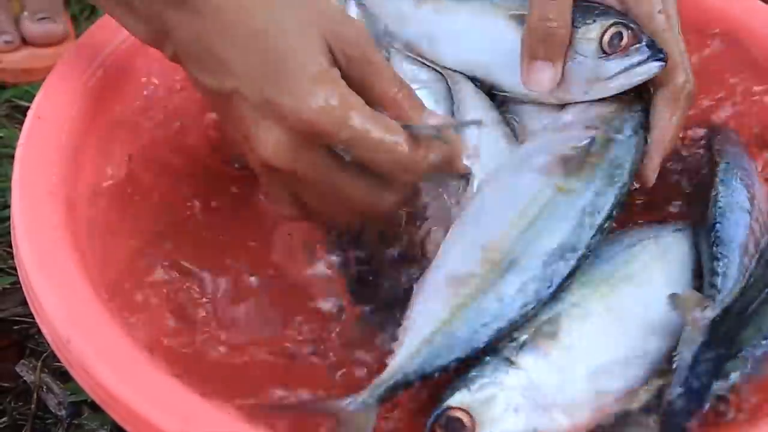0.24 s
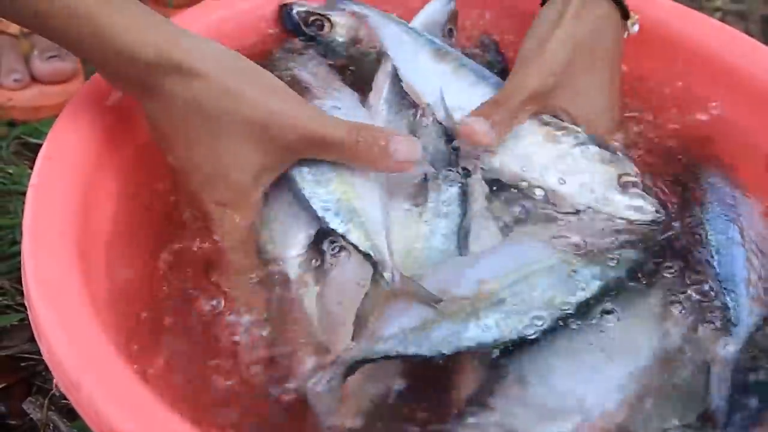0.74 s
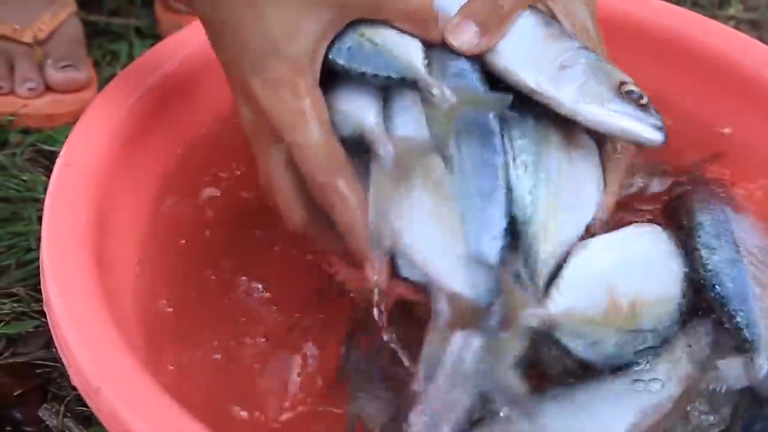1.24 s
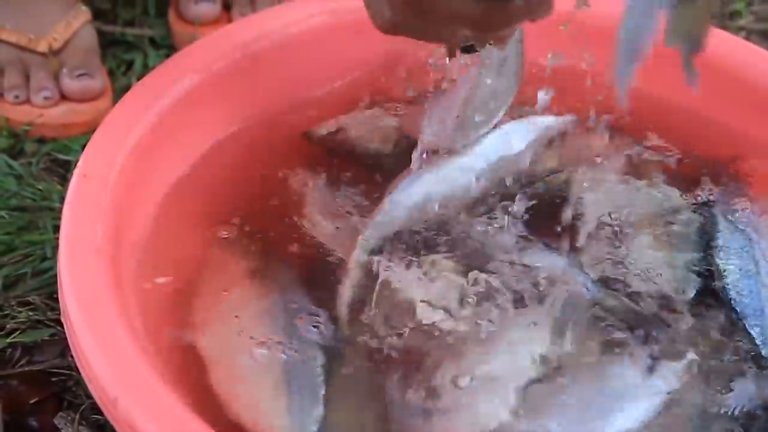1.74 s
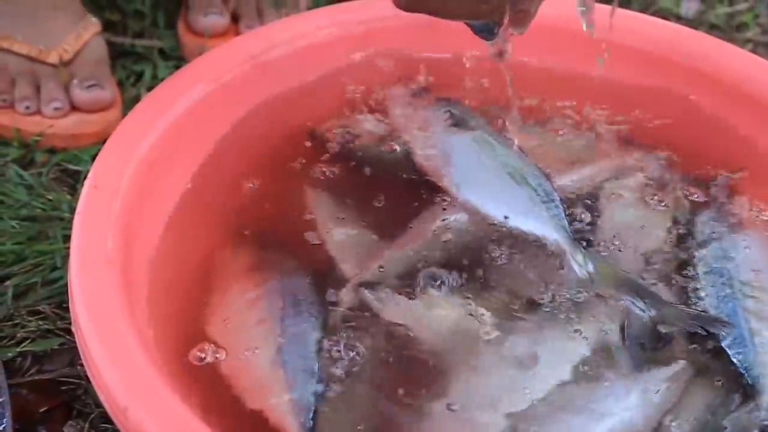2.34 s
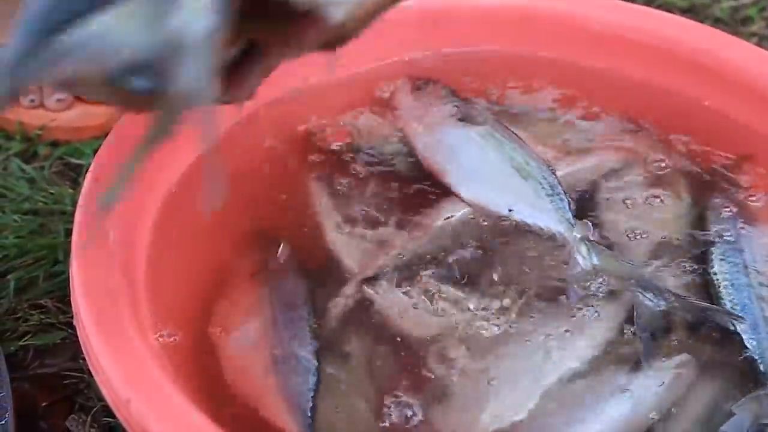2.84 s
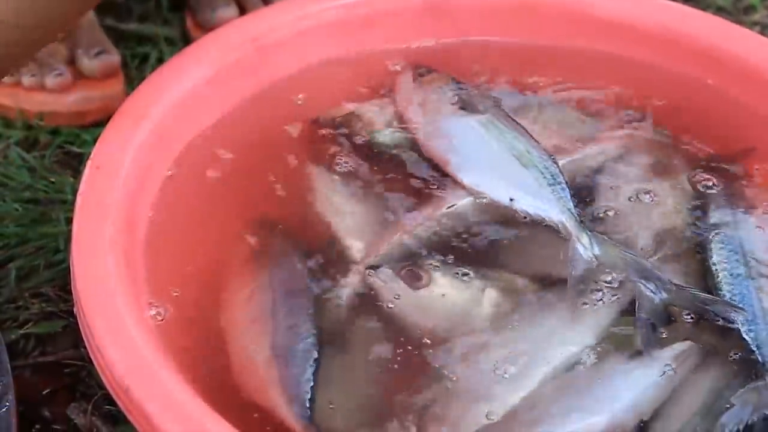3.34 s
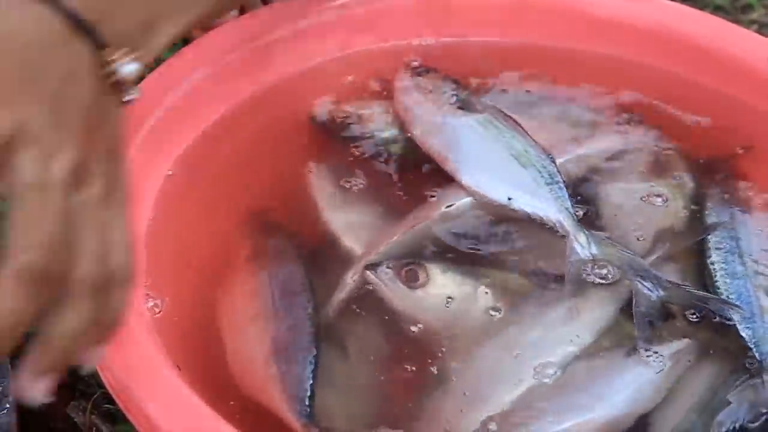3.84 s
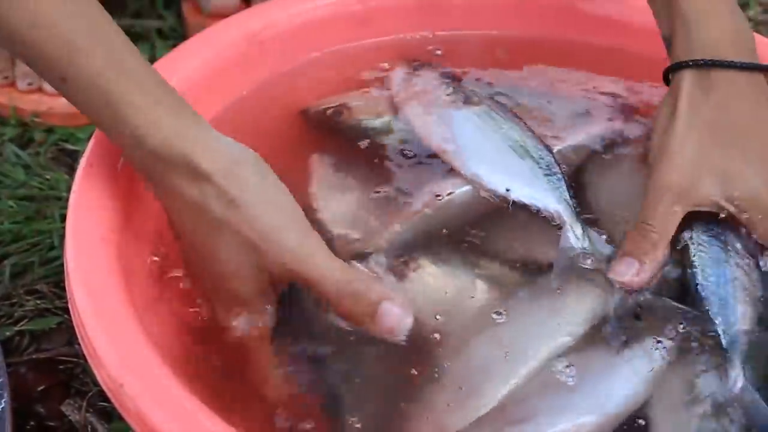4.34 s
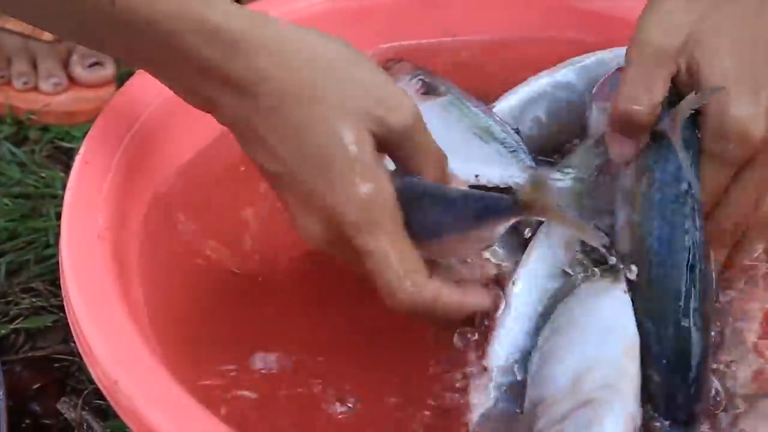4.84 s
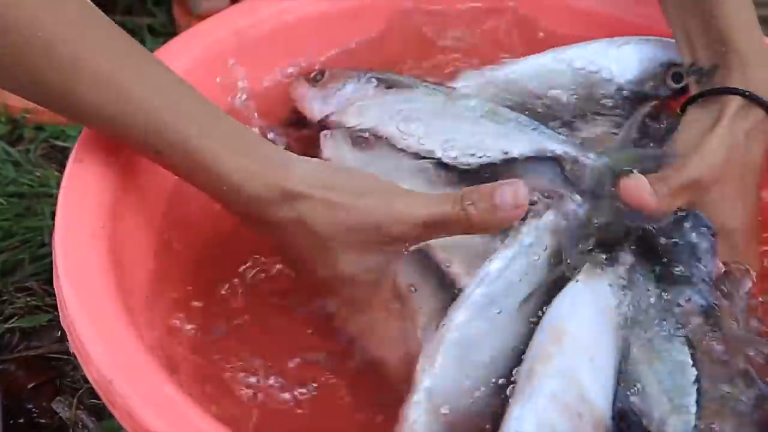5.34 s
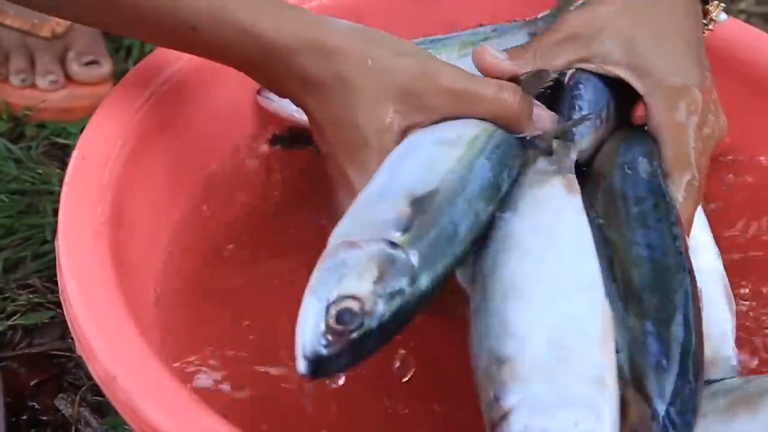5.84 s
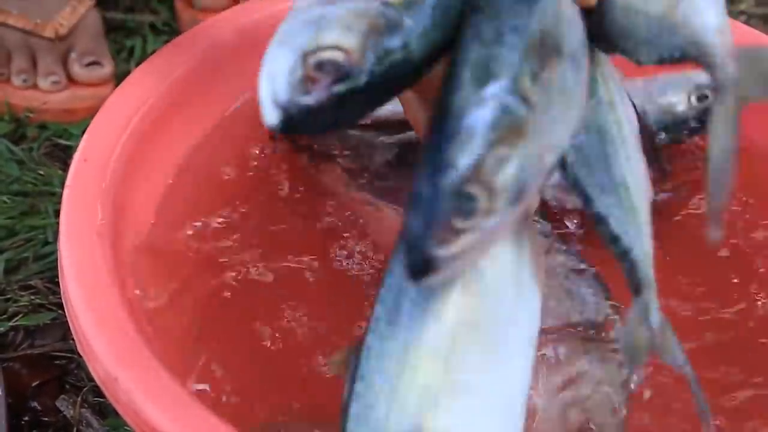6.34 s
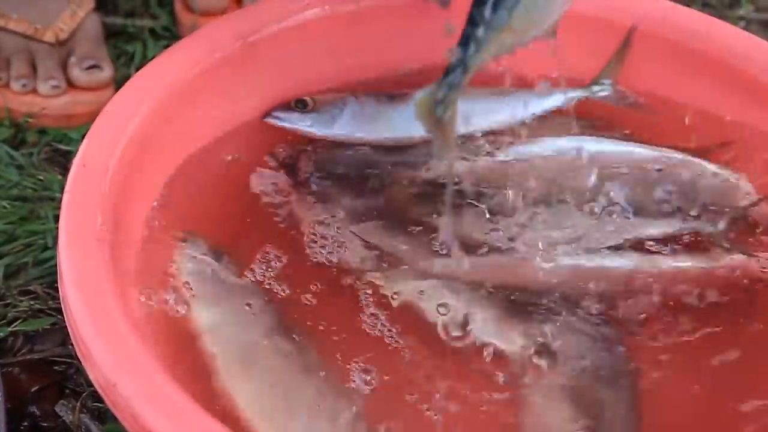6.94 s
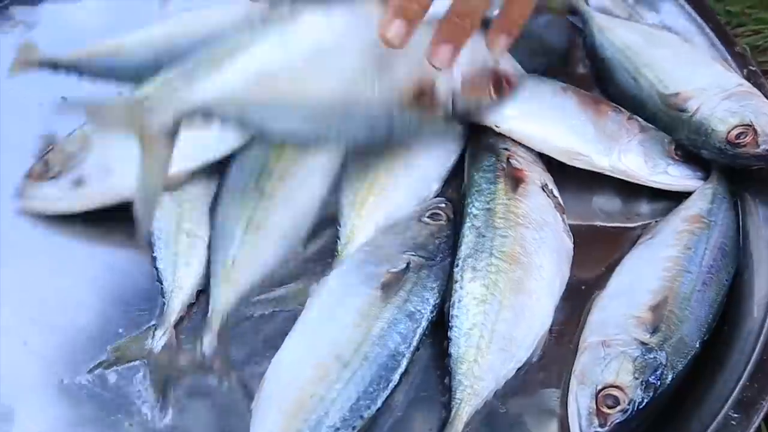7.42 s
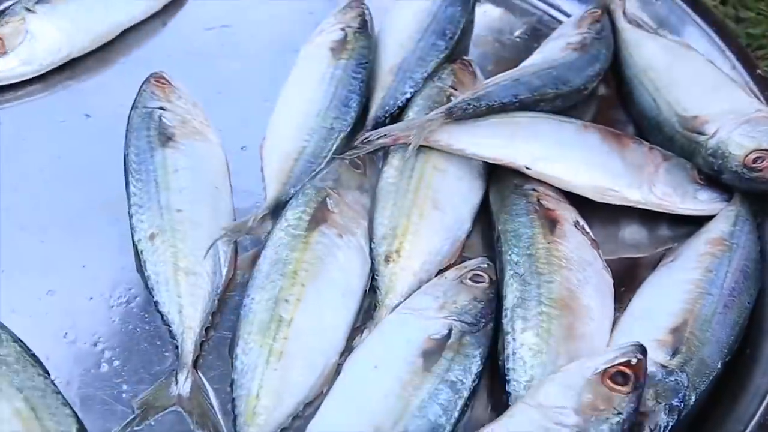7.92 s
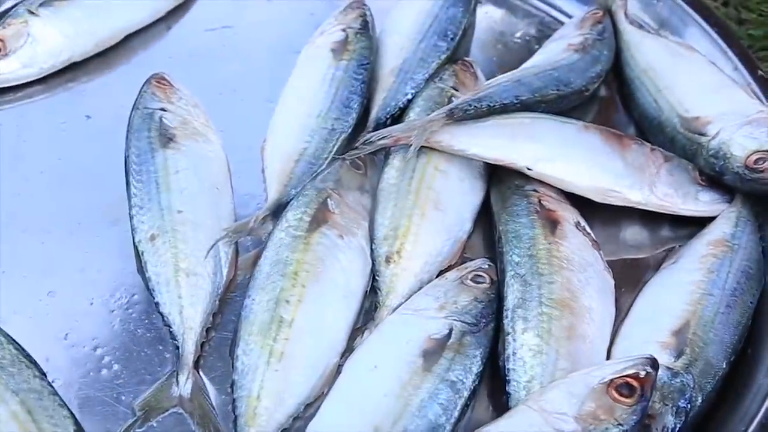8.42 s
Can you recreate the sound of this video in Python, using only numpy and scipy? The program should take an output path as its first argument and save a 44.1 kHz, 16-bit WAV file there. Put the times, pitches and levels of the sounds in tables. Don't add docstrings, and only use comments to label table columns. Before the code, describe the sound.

Hands slosh and gurgle water in a plastic basin washing fish, with drips, wet slaps, faint steel tray rings, low wind rumble and far birds.

```python
import sys
import numpy as np
from scipy import signal
from scipy.io import wavfile
from scipy.ndimage import uniform_filter1d

SR = 44100
rng = np.random.default_rng(int(sys.argv[2]) if len(sys.argv) > 2 else 0)


def master_out(mix):
    frames = np.transpose(np.atleast_2d(mix))
    ceiling = np.clip(frames, -1, 1)
    pcm = np.round(ceiling * 32767).astype(np.int16)
    wavfile.write(sys.argv[1], SR, pcm)


def magnitude_from_level(level_db):
    exponent = np.asarray(level_db, float) / 20
    return 10 ** exponent


N = 382788
TOP_HZ = 15900

# start_s [s], peak_db [dB], pitch_hz [Hz]
EARLY_DROPLETS = [(0.079, -20, 4110), (0.187, -13, 3660), (0.2079, -15, 7250), (0.2355, -15, 5200),
                  (0.299, -12, 7500), (0.3645, -16, 3840), (0.39, -18, 8660), (0.425, -25, 5500),
                  (0.5165, -16, 4510), (0.575, -13, 3600), (0.604, -15, 4770), (0.617, -8.5, 8300),
                  (0.6264, -14, 3660), (0.636, -12, 4370), (0.6624, -38, 3670), (0.7593, -20.5, 5640),
                  (0.813, -21, 8350), (0.898, -23, 4670), (1.0137, -30, 5830), (1.0266, -25.5, 3680),
                  (1.0807, -26, 4100), (1.102, -21, 4400), (1.185, -21, 5870), (1.3265, -27, 7060),
                  (1.376, -16, 8000), (1.4073, -18, 5070), (1.494, -17, 6700), (1.59, -12.5, 5630),
                  (1.9732, -17.5, 4010), (2.1935, -27, 8570), (2.2073, -19, 8200), (2.2323, -31, 3470),
                  (2.3191, -21.5, 7140), (2.361, -22, 8900), (2.379, -15.5, 12800), (2.4404, -24, 4830),
                  (2.5436, -19.5, 3640), (2.6, -19, 13000), (2.7787, -28, 5270), (2.804, -25, 4330)]
# start_s [s], peak_db [dB], pitch_hz [Hz]
LATER_DROPLETS = [(3.6254, -20, 9100), (3.8018, -20, 3600), (4.349, -19, 6900), (4.495, -28, 4280),
                  (4.5967, -23, 4330), (4.7636, -21, 4910), (4.78, -16, 3530), (4.835, -13, 7180),
                  (4.9801, -34, 7550), (5.0146, -12.5, 8980), (5.3694, -16.5, 7560), (5.489, -26, 7240),
                  (5.5212, -25, 3760), (5.599, -15, 12900), (5.637, -17, 4620), (5.902, -32, 4970),
                  (6.037, -21.5, 7520), (6.0482, -15.5, 4660), (6.1356, -26, 3900), (6.3856, -14, 3910),
                  (6.57, -23.5, 5980), (6.6822, -21, 4900), (6.757, -24, 7120), (6.797, -19, 4000),
                  (6.8905, -24.5, 4120), (6.96, -19, 8360), (6.986, -26, 7100), (7.1, -26, 12700),
                  (7.116, -14.5, 6840), (7.4804, -28, 4140), (8.207, -23, 7370), (8.2628, -28, 4540),
                  (8.091, -25, 2950), (8.534, -24, 4570), (8.612, -26.5, 3810)]


def rms_one(x):
    return x / np.sqrt(np.mean(x ** 2) + 1e-20)


def band(x, low_hz, high_hz, order=2):
    edges_hz = [low_hz, min(high_hz, .45 * SR)]
    return signal.sosfilt(signal.butter(order, edges_hz, "band", fs=SR, output="sos"), x)


def drift(rate):
    r = np.exp(-80 * np.pi * rate / SR)
    slow = signal.lfilter([1], [1, -2 * r, r * r], rng.standard_normal(N // 40 + 2002))
    slow = slow[2000:]
    return np.interp(np.arange(N) / 40, np.arange(len(slow)), rms_one(slow))


def add(out, start_s, sound):
    at = max(round(start_s * SR), 0)
    out[at:at + len(sound)] += sound[:N - at]


def swells(rows, rest_db):
    t = np.arange(0, N, 64) / SR
    each = []
    for peak_s, peak_db, build_s, die_s in rows:
        before = (peak_s - t) / max(build_s, .02)
        after = (t - peak_s) / max(die_s, .02)
        each.append(peak_db - 20 * np.maximum(before, after))
    return np.interp(np.arange(N) / SR, t, np.maximum(np.max(each, axis=0), rest_db))


def wind():
    # peak_s [s], rumble_db [dB], build_up_s [s], dying_away_s [s]
    gusts = [(0.01, -34, 0.33, 0.19), (.58, -30, 0.19, 0.75), (1.2, -33.5, 0.31, 0.8),
             (1.72, -21, 0.11, 0.09), (2.1, -24, 1, 0.21), (2.41, -22.5, 0.18, 0.74),
             (2.98, -23.5, 0.2, 0.31), (3.34, -12.5, 0.29, 0.098), (3.54, -22.5, .7, 0.51),
             (3.85, -19.5, 0.41, 0.069), (4.31, -24.5, 1.3, 0.87), (4.75, -21.5, 0.25, 0.16),
             (5.16, -22.5, 0.53, 0.78), (5.87, -25, 1.6, 0.64), (6.97, -21, 0.69, 0.63),
             (7.43, -16.5, 0.18, 0.27), (7.69, -19, 0.058, 1), (8.15, -18.5, 0.72, 0.31),
             (8.67, -21.5, 3.2, .5)]
    # peak_s [s], flutter_db [dB], build_up_s [s], dying_away_s [s]
    buffets = [(.45, -43, 3.5, 0.28), (2.1, -43, 6.8, 0.21), (2.41, -39.5, 0.1, 0.79),
               (3.22, -18.5, 0.056, 0.15), (3.54, -28, 0.1, 0.19), (4.31, -39.5, 0.4, 4.4),
               (4.75, -35.5, 0.92, 0.25), (5.16, -36, 0.11, 0.2), (6.2, -44.5, 1, 3.8),
               (6.97, -35, 0.53, 0.73), (7.43, -23.5, 0.2, 0.3), (7.78, -19, 0.27, 0.26),
               (8.15, -17, 0.19, 0.096), (8.49, -28.5, 0.78, 0.32)]
    rumble_db = swells(gusts, rest_db=-53)
    flutter_db = swells(buffets, rest_db=-58.5)
    white = rng.standard_normal((2, N))
    rumble = rms_one(band(white[0], 14, 44) * magnitude_from_level(3 * drift(8)))
    flutter = band(white[1], 61.3, 147.5, order=3) + 0.014 * band(white[1], 130, 540)
    flutter = rms_one(flutter * magnitude_from_level(6.1 * drift(30.5)))
    return magnitude_from_level(rumble_db) * rumble + magnitude_from_level(flutter_db) * flutter


def air():
    # pitch_hz [Hz], level_db [dB per Hz]
    air_colour = [(88, -40), (150, -2.5), (422, -3), (566, -9.5), (730, -11), (871, -4), (1040, -16),
                  (16000, -25)]
    colour_hz, colour_db = np.transpose(air_colour)
    edges_hz = 150 * 2 ** np.arange(0, 7.1, .5)
    white = rng.standard_normal((2, N))
    hiss = np.zeros(N)
    for k, (low, high) in enumerate(zip(edges_hz, edges_hz[1:])):
        middle = np.log(low * high) / 2
        own_db = np.interp(middle, np.log(colour_hz), colour_db)
        hiss += magnitude_from_level(own_db + drift(5.5)) * band(white[k % 2], low, high)
    top_filter = signal.cheby2(10, 40, TOP_HZ, fs=SR, output="sos")
    return magnitude_from_level(-50.5) * signal.sosfilt(top_filter, rms_one(hiss))


def ringing(rows):
    out = np.zeros(N)
    for start_s, level_db, hz, t60_s, rise in rows:
        t60_s, rise = max(t60_s, .001), np.clip(rise, 0, 8)
        t = np.arange(int(t60_s * SR)) / SR
        swell_in = np.minimum(t * min(hz, 5000), 1)
        shape = magnitude_from_level(level_db - 60 * t / t60_s) * swell_in
        bent_t = t + rise * t ** 3 / t60_s ** 2 / 3
        add(out, start_s, shape * np.sin(2 * np.pi * hz * bent_t))
    return out


def crowd(low_hz, high_hz, cycles, spread_db, count):
    u = rng.random((count, 6))
    density = np.cumsum(magnitude_from_level(4 * drift(20)))
    at = np.minimum(np.searchsorted(density, u[:, 0] * density[-1]), N - 1)
    hz = low_hz * (high_hz / low_hz) ** ((u[:, 1] + u[:, 5]) / 2)
    size_db = -spread_db * np.log(u[:, 2] + .02) - .5 * np.log2(hz / low_hz)
    ring_cycles = cycles * (0.5 + u[:, 3] ** 2)
    rise = 4.5 * u[:, 4] ** 1.5 * (hz < 6000)
    return rms_one(ringing(np.c_[at / SR, size_db, hz, ring_cycles / hz, rise]))


def hands_away():
    # from_s [s], to_s [s]
    quiet_times = [
        (.78, 1.15),
        (2.25, 4.22),
        (6.5, 8.17),
    ]
    t = np.arange(N) / SR
    away = sum((t > from_s) * (t < to_s) for from_s, to_s in quiet_times)
    return uniform_filter1d(away * 1., size=2000)


def small_bubbles(level_db):
    away = hands_away()
    rush = rms_one(band(rng.standard_normal(N), 450, 3800)) * magnitude_from_level(4 * drift(110))
    gurgle = crowd(750, 7500, cycles=46, spread_db=3.6, count=3500)
    return magnitude_from_level(level_db - 5) * ((1 - .7 * away) * gurgle + (.3 + .45 * away) * rush)


def spray(level_db):
    away = hands_away()
    hiss = rms_one(band(rng.standard_normal(N), 3000, 11000)) * magnitude_from_level(2 * drift(25))
    ticking = crowd(4000, 19500, cycles=15, spread_db=5.2, count=1900)
    return magnitude_from_level(level_db - 6) * ((1 - .6 * away) * ticking + (.11 + .3 * away) * hiss)


def large_bubbles():
    # start_s [s], peak_db [dB], pitch_hz [Hz], t60_s [s]
    hanging = [(6.4419, -16.5, 1096, 0.11), (0.022, -27.5, 1480, 0.032), (0.364, -34, 1240, 0.028),
               (0.405, -21, 1320, 0.032), (0.43, -17, 1210, 0.038), (0.515, -22, 1120, 0.024),
               (0.545, -26, 1390, 0.024), (0.627, -25, 3060, 0.039), (0.729, -22.5, 1390, 0.028),
               (0.981, -25, 774, 0.021), (1.088, -25, 1960, 0.023), (1.327, -28, 773, 0.024),
               (1.349, -18, 764, 0.023), (1.434, -22, 3260, 0.03), (1.5, -24, 980, 0.015),
               (1.644, -20.5, 1000, 0.027), (1.761, -23, 1140, 0.039), (1.823, -26.5, 1103, 0.093),
               (4.294, -21, 620, 0.02), (4.394, -18, 1510, 0.017), (4.672, -24, 1870, 0.035),
               (4.698, -18.5, 2550, 0.022), (4.862, -20, 2240, 0.036), (4.918, -18, 1650, 0.032),
               (4.98, -24, 1370, 0.032), (5.035, -18, 830, 0.045), (5.066, -12, 960, 0.02),
               (5.132, -19.5, 2030, 0.047), (5.225, -28, 1470, 0.035), (5.36, -27.5, 1700, 0.047),
               (5.518, -29, 2200, 0.033), (5.9, -26.5, 1330, 0.035), (6.2, -22, 710, 0.037),
               (6.329, -25, 785, 0.06), (6.666, -32.5, 1250, 0.11), (6.699, -32, 1580, 0.041),
               (6.871, -27, 2320, 0.025), (7.29, -27, 810, 0.016), (8.187, -24, 1265, 0.061),
               (8.515, -31, 790, 0.067)]
    # start_s [s], peak_db [dB], pitch_hz [Hz], t60_s [s]
    drips = [(.056, -27.5, 935, 0.082), (1.788, -9, 1560, 0.02), (0.0703, -15.5, 1220, 0.042),
             (0.0799, -18.5, 990, 0.071), (0.6806, -4.5, 2820, 0.019), (1.057, -26, 1130, 0.036),
             (1.366, -27.5, 640, 0.1), (6.378, -10, 510, 0.012), (.57, -22, 671, 0.16),
             (1.41, -25, 755, 0.082), (1.7398, -24, 3900, 0.036), (1.9135, -21.5, 1550, 0.055),
             (2.1378, -19, 950, 0.073), (2.449, -24.5, 1660, 0.023), (2.464, -30, 1390, 0.042),
             (2.521, -26, 1260, 0.044), (2.5447, -24, 1294, 0.058), (2.5884, -22, 1162, 0.055),
             (2.638, -27.5, 3430, 0.018), (4.7914, -17.5, 865, 0.089), (5.0459, -13, 4404, 0.012),
             (5.6805, -11, 1565, 0.046), (5.7035, -17.5, 1380, 0.092), (5.79, -16.5, 1450, 0.06),
             (6.4267, -6.5, 1180, 0.063), (6.822, -20, 4030, 0.015), (7.0179, -23, 2440, 0.036),
             (2.2413, -21, 3420, 0.026), (2.2413, -27, 3010, 0.038), (5.6545, -7, 2220, 0.019),
             (5.8419, -16, 1084, 0.054), (6.0627, -20, 2920, 0.031), (4.753, -20, 880, 0.044),
             (6.413, -16, 2150, 0.017), (.252, -24, 923, 0.11), (.049, -18.5, 2450, 0.019),
             (5.625, -10.5, 1510, 0.012), (8.643, -32.5, 1080, 0.055), (7.0821, -25, 1380, 0.056)]
    # start_s [s], peak_db [dB], pitch_hz [Hz]
    plops = [(0.152, -12, 1850), (0.58, -12, 1900), (0.5907, -13, 1150), (1.1697, -11.5, 1760),
             (1.2426, -12.5, 800), (1.267, -13, 1010), (1.2908, -13, 1340), (1.5196, -9.5, 960),
             (1.571, -16, 1350), (2.0314, -7.5, 1430), (4.1828, -11, 850), (4.441, -12, 2310),
             (4.654, -13.5, 2140), (5.645, -10, 1170), (5.768, -10, 887), (5.8427, -11.5, 1865),
             (6.7312, -5.5, 1970)]
    # start_s [s], peak_db [dB], pitch_hz [Hz], t60_s [s]
    glugs = [
        (0.2041, -12.5, 1180, 0.09),
        (0.229, -15.5, 2020, 0.045),
        (2.0588, -22.5, 860, 0.16),
        (2.1686, -18.5, 955, 0.12),
        (4.7371, -20, 1740, 0.043),
        (5.0383, -11, 3200, 0.025),
        (5.5717, -1.5, 3060, 0.0084),
        (.168, -27.5, 756, 0.16),
        (.203, -25, 547, 0.1),
    ]
    # start_s [s], peak_db [dB], pitch_hz [Hz]
    ticks = [(0.4358, -11, 5360), (1.447, -14.5, 3300), (1.555, -11.5, 2680), (1.6104, -13.5, 2660),
             (1.6618, -13.5, 2600), (1.709, -14, 5040), (1.841, -13, 2670), (2.5215, -16, 3000),
             (4.184, -18, 4300), (4.419, -14, 3340), (4.6527, -10, 6040), (4.7442, -11, 2650),
             (4.8685, -9.5, 4700), (5.096, -7.5, 2150), (5.153, -9, 2860), (5.5554, -24, 11000),
             (5.749, -13.5, 2230), (6.1966, -11, 4760), (6.2, -15, 3120), (6.2048, -10, 5250),
             (6.299, -17, 2800), (6.7186, -10.5, 4230), (6.731, -11, 5230)]
    # start_s [s], peak_db [dB], pitch_hz [Hz], t60_s [s]
    thuds = [(6.773, -17, 340, 0.038), (3.5464, 2.5, 1815, 0.002), (3.5499, 12, 850, 0.0026),
             (3.6752, -10.5, 3800, 0.0023), (3.8197, -7.5, 2900, 0.004), (7.4484, -15, 542, 0.095),
             (7.4553, -13, 740, 0.04), (7.48, -11, 570, 0.038), (7.5481, 13, 577, 0.011),
             (7.5497, -6, 1260, 0.013), (7.5564, 6, 1090, 0.0037), (7.717, -8, 1630, 0.0075),
             (7.7177, -1.5, 655, 0.0089), (7.7692, 9, 762, 0.0032), (8.2135, -26, 1250, 0.079),
             (8.3162, -4, 2430, 0.0015)]
    rows = [(s, db, hz, 29.7 / hz, 2.17) for s, db, hz in ticks]
    rows += [(s, db, hz, 22 / hz, 2.04) for s, db, hz in plops]
    rows += [(s, db - 4, hz, 48 / hz, 0) for s, db, hz in EARLY_DROPLETS + LATER_DROPLETS]
    for table, rise in (hanging, 0.14), (glugs, 5.2), (drips, 0.56), (thuds, 2.03):
        rows += [(*row, rise) for row in table]
    return ringing(rows)


def splats():
    # start_s [s], peak_db [dB], t60_s [s]
    full_slaps = [(0.0677, -28, 0.0074), (0.4317, -27.5, 0.034), (0.5394, -34, 0.024), (1.659, -32, 0.019),
                  (1.7376, -31, 0.02), (1.777, -34, 0.037), (2.1487, -38.5, 0.026), (3.5498, -31.5, 0.18),
                  (4.1821, -30, 0.02), (4.868, -34.5, 0.088), (4.917, -34.5, 0.026), (5.031, -23.5, 0.038),
                  (5.156, -26.5, 0.04), (5.446, -34, 0.033), (5.5728, -26.5, 0.02), (6.1969, -23, 0.034),
                  (6.329, -27.5, 0.024), (7.449, -22.5, 0.034), (7.48, -22.5, 0.017), (7.5581, -16, 0.016),
                  (7.6264, -30, 0.028), (7.7152, -27.5, 0.033), (7.7659, -26.5, 0.04)]
    # start_s [s], peak_db [dB], t60_s [s]
    thin_cracks = [(0.4978, -27, 0.012), (1.45, -15.5, 0.013), (1.521, -26, 0.027), (1.899, -27, 0.014),
                   (2.412, -36.5, 0.02), (3.642, -30.5, 0.11), (4.543, -26.5, 0.0086),
                   (4.816, -21.5, 0.023), (5.1313, -21, 0.017), (5.293, -23.5, 0.034), (6.02, -30, 0.012),
                   (6.7193, -27.5, 0.02), (6.772, -17, 0.019), (6.8207, -32, 0.0075),
                   (6.8527, -22.5, 0.016), (8.318, -17.5, 0.0063), (8.3603, -21, 0.01),
                   (8.6475, -24, 0.011)]
    full_body_db, thin_body_db = -6.5, -18.5
    white = rng.standard_normal((2, N + SR))
    crack = rms_one(band(white[0], 5320, 9700) + 0.57 * band(white[0], 12600, 14400))
    body = rms_one(band(white[1], 430, 3530))
    crack *= magnitude_from_level(4.0 * rms_one(uniform_filter1d(white[1], size=90)))

    bursts = [(*row, full_body_db) for row in full_slaps]
    bursts += [(*row, thin_body_db) for row in thin_cracks]
    bursts += [(s, db - 15, .01, thin_body_db) for s, db, hz in EARLY_DROPLETS + LATER_DROPLETS]
    out = np.zeros(N)
    for start_s, peak_db, t60_s, body_db in bursts:
        t60_s = np.clip(t60_s, .004, .09)
        t = np.arange(int(t60_s * SR)) / SR
        at = round(start_s * SR)
        puff = crack[at:at + len(t)] + magnitude_from_level(body_db + 9.5) * body[at:at + len(t)]
        fade = magnitude_from_level(peak_db + 4.5 - 60 * t / t60_s)
        add(out, start_s, fade * np.minimum(t / 0.0017, 1) * puff)
    return out


def risers():
    racing = [(0.334, -34.5, 740, 1410, .04), (.64, -32, 1590, 2300, 0.025), (0.68, -46, 2950, 4640, 0.019),
              (0.718, -43, 1500, 3100, 0.026), (2.086, -27.5, 1010, 1800, .018),
              (2.178, -39, 1400, 2280, 0.031), (4.439, -24.5, 1430, 2600, .03),
              (4.442, -26, 2300, 3240, .016), (4.802, -31.5, 1110, 1700, 0.039),
              (5.068, -32.5, 520, 1900, .08), (5.16, -18.5, 1030, 1950, 0.027),
              (5.449, -20.5, 896, 1810, 0.02), (5.476, -31, 1590, 3020, 0.023),
              (8.206, -31, 1680, 3000, .023)]
    out = np.zeros(N)
    for start_s, level_db, start_hz, end_hz, length_s in racing:
        u = np.linspace(0, 1, int(length_s * SR))
        phase = 2 * np.pi * np.cumsum(start_hz + (end_hz - start_hz) * u) / SR
        shape = np.minimum(20 * u, 1) * (1 - u ** 2)
        add(out, start_s, magnitude_from_level(level_db) * shape * np.sin(phase))
    return out


def tray():
    # start_s [s], ring_db [dB], slap_db [dB]
    landings = [(3.198, -33, -44), (3.512, -69, -22.5), (3.547, -14.5, -13.5), (3.646, -26, -25),
                (0.782, -69, -34), (3.821, -26, -50), (6.727, -67, -20.5), (7.259, -34, -56),
                (7.448, -18, -18), (7.48, -60, -22), (7.548, -15.5, -16), (7.648, -60, -27),
                (7.717, -43, -27), (7.862, -32, -37), (8.188, -42, -30.5), (8.437, -60, -26)]
    # pitch_hz [Hz], level_db [dB], t60_s [s]
    steel_tones = [(745, -22, .6), (850, -24, .5), (1160, -20, .7), (1215, -19, .85), (2620, -22, .25),
                   (2060, -25, .2)]
    out = np.zeros(N)
    for hz, tone_db, t60_s in steel_tones:
        rows = []
        for start_s, ring_db, slap_db in landings:
            rows.append((start_s, ring_db + tone_db + rng.normal(0, 5.0), hz, t60_s, 0))
        out += ringing(rows) * (.55 + .65 * drift(35))
    white = rng.standard_normal(N)
    rough = rms_one(band(white, 326, 1080) + 0.1 * band(white, 750, 4400)) * magnitude_from_level(2.6 * drift(83))
    t = np.arange(int(.16 * SR)) / SR
    for start_s, ring_db, slap_db in landings:
        noise = rough[round(start_s * SR):][:len(t)]
        add(out, start_s, magnitude_from_level(slap_db - 60 * t / 0.089)[:len(noise)] * noise)
    return out


def birds():
    chirps = [
        (.89, .09, 4600, 3900, -51),
        (2.45, .07, 4600, 3100, -46),
        (2.41, .07, 2650, 2680, -47),
        (2.65, .08, 5200, 2900, -49),
        (2.83, .15, 2650, 2670, -42),
        (6.61, .05, 3800, 3000, -47),
        (7.955, .02, 5500, 4200, -42),
        (7.98, .05, 4200, 2800, -36.5),
        (8.48, .06, 4200, 3100, -50),
    ]
    out = np.zeros(N)
    for start_s, length_s, start_hz, end_hz, level_db in chirps:
        hz = np.geomspace(start_hz, end_hz, int(length_s * SR))
        whistle = np.sin(2 * np.pi * np.cumsum(hz) / SR)
        add(out, start_s, magnitude_from_level(level_db) * np.hanning(len(hz)) * whistle)
    add(out, .013, .6 * out.copy())
    return out * (.8 + .6 * drift(150))


def basin(x):
    out = x.copy()
    add(out, .0074, magnitude_from_level(-21.0) * band(x, 560, 4000))
    return out


def scene():
    # peak_s [s], peak_db [dB], build_up_s [s], dying_away_s [s]
    strokes = [(0.07, -32, 0.041, 0.71), (0.22, -19.5, 0.08, 0.088), (0.42, -25.5, 0.42, 0.086),
               (0.61, -27.5, 0.27, 0.26), (1.09, -39.5, 0.089, 2.4), (1.27, -34.5, 0.26, 0.063),
               (1.55, -25.5, 0.43, 0.21), (1.82, -29, 0.21, 0.17), (2.05, -35.5, 0.23, 0.15),
               (2.17, -34, 0.11, 0.087), (2.51, -46, 0.94, 0.81), (3.56, -26.5, 0.061, 0.1),
               (3.82, -26, 0.043, 0.061), (4.245, -34, 0.047, 0.23), (4.42, -29, 0.3, 0.08),
               (4.77, -24, 0.19, 0.37), (5.05, -22, 0.071, 0.18), (5.23, -35, 0.64, 3.8),
               (5.68, -25, 0.27, 0.49), (6.32, -25, 0.086, 0.036), (6.44, -24.5, 0.15, 0.073),
               (6.65, -39, 1, 0.53), (7.1, -36.5, 0.055, 0.48), (7.47, -32.5, 0.04, 0.5),
               (7.98, -37, 0.63, 0.53), (8.195, -34.5, 0.036, 0.67), (8.44, -41.5, 0.11, 3.2)]
    # peak_s [s], spray_db [dB], build_up_s [s], dying_away_s [s]
    draining = [(.36, -32, 1.7, 0.33), (.61, -32, 0.31, 0.12), (1.75, -35, 1.5, 0.75),
                (2.05, -38, 0.76, 0.058), (2.2, -46, 0.083, 0.43), (2.55, -37.5, 2.5, 0.23),
                (3.82, -21.5, 0.058, 0.016), (6.55, -40, 0.64, 0.14), (6.75, -29.5, 0.15, 0.074),
                (7.1, -36.5, 0.16, 1.3), (7.96, -37, 0.59, 0.18), (8.6, -45, 1.6, 0.72)]
    stir_db = swells(strokes, rest_db=-50)
    spray_db = np.maximum(stir_db - 7.5, swells(draining, rest_db=-62))
    water = large_bubbles() + risers() + splats() + small_bubbles(stir_db) + spray(spray_db)
    return (basin(water) + tray() + birds() + air() + wind())[None]


def band_limit(x):
    return signal.sosfilt(signal.butter(12, 16990, fs=SR, output="sos"), x)


def record(dry):
    dropout = 7.153, 7.232
    mute_start_s, mute_end_s = dropout
    t = np.arange(N) / SR
    fade_out = (mute_start_s - t) / 0.00044
    fade_in = (t - mute_end_s) / 0.0018
    gate = np.clip(np.maximum(fade_out, fade_in), .0004, 1)
    top_filter = signal.cheby2(18, 40, 1.05 * TOP_HZ, fs=SR, output="sos")
    mix = signal.sosfilt(top_filter, np.clip(dry, -1, 1)) * gate
    return band_limit(mix)


dry = scene()
out = record(dry)
master_out(out)
```